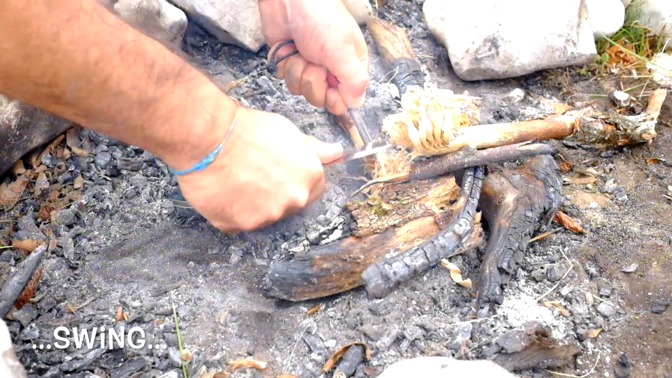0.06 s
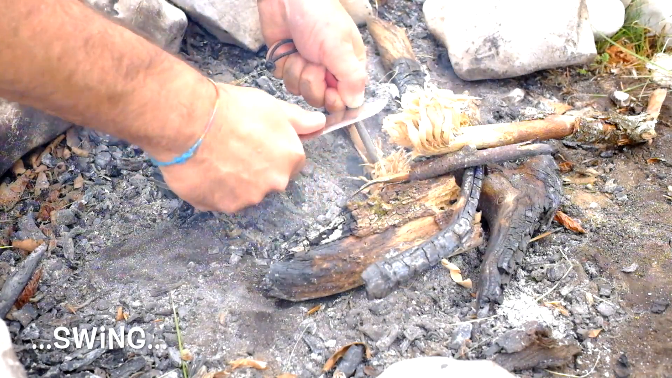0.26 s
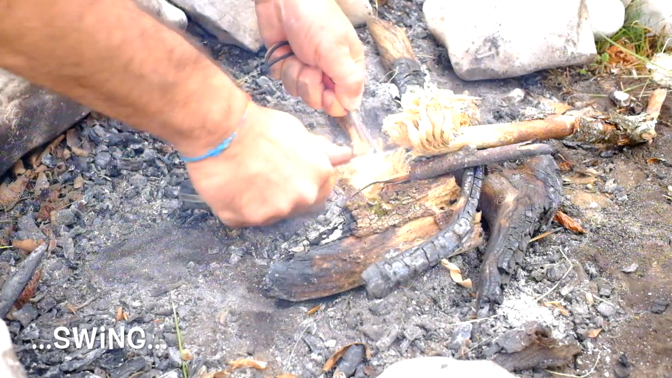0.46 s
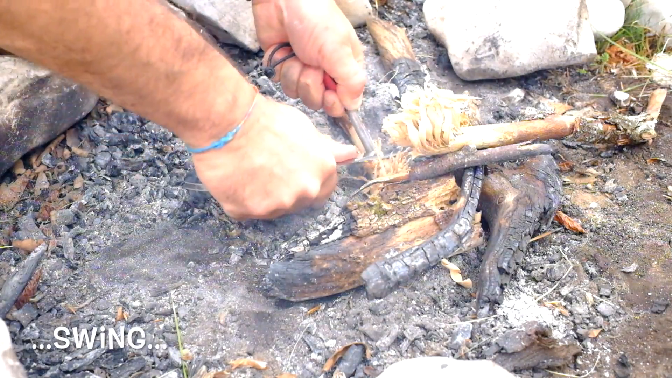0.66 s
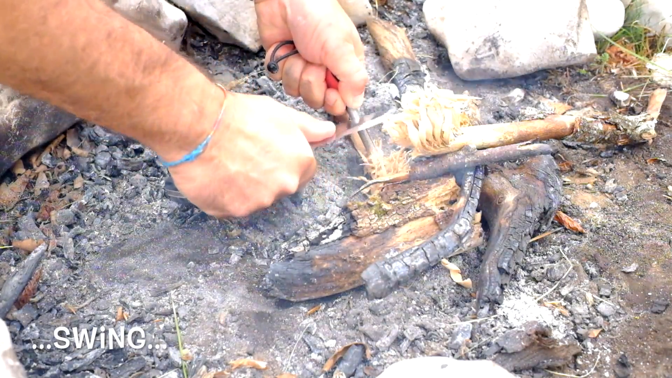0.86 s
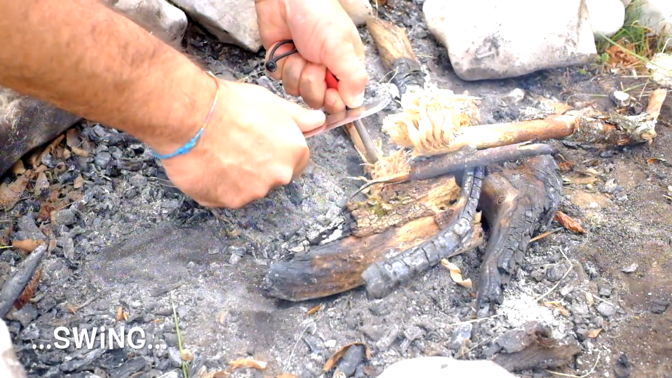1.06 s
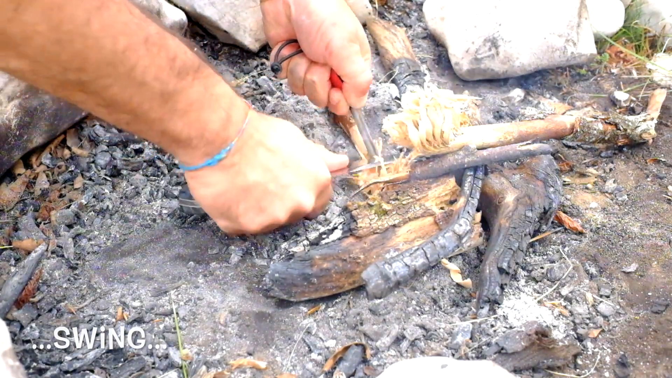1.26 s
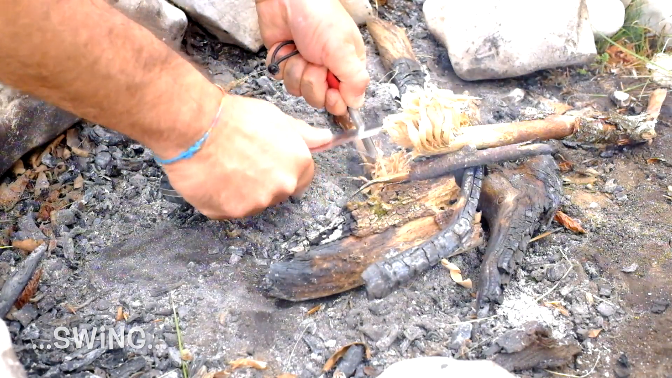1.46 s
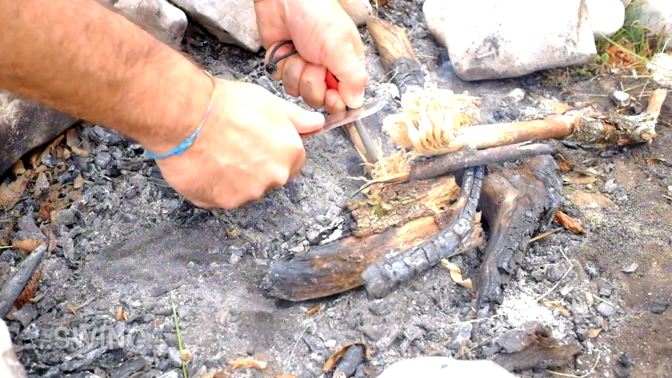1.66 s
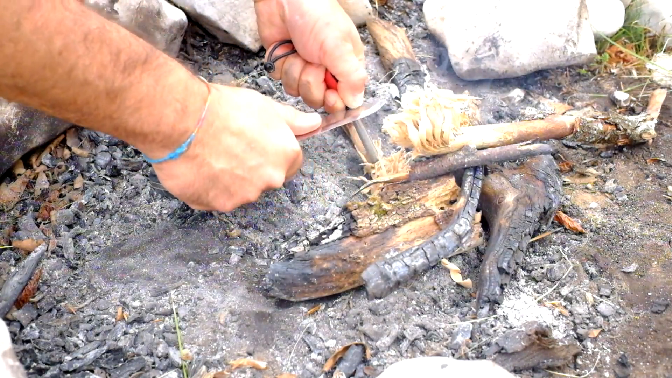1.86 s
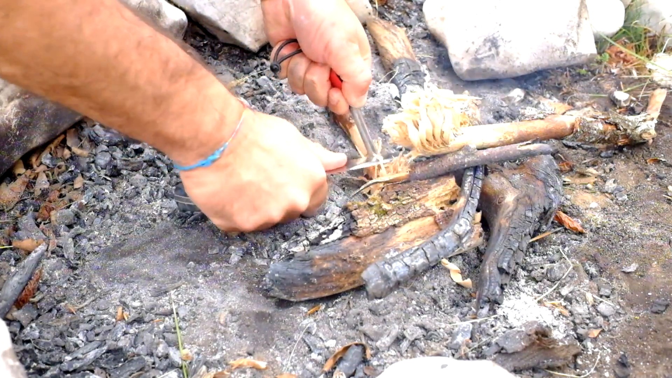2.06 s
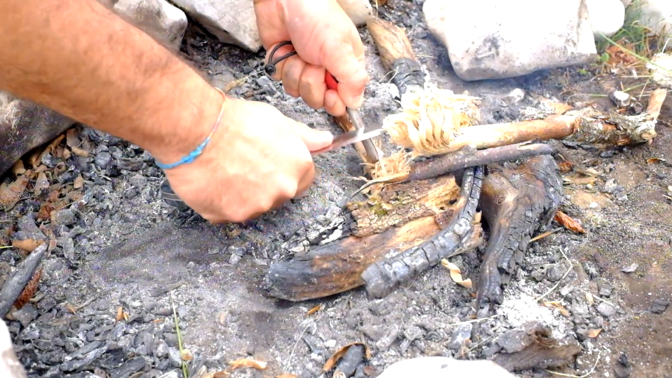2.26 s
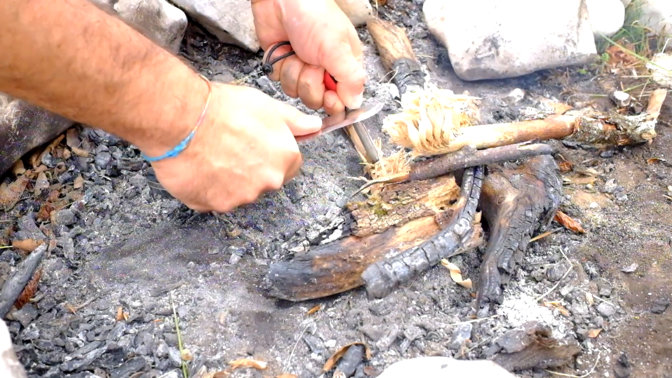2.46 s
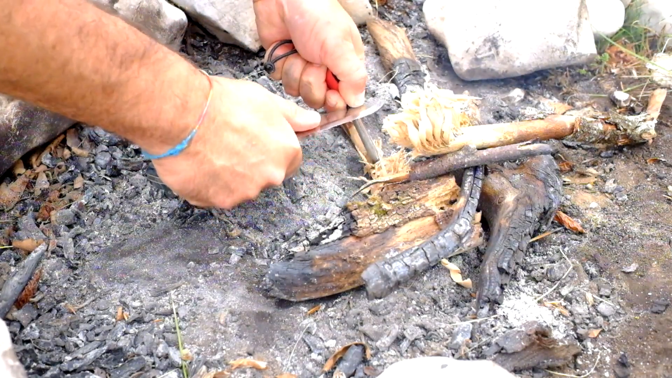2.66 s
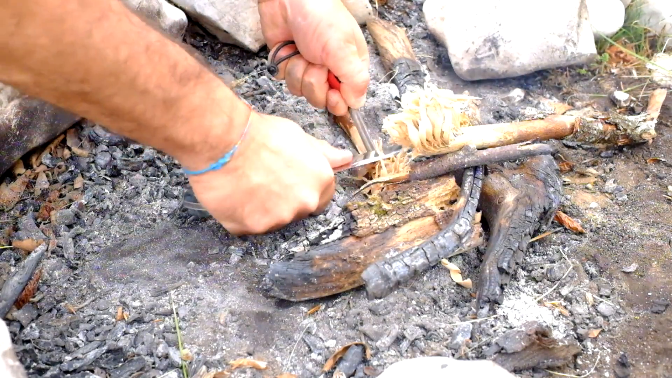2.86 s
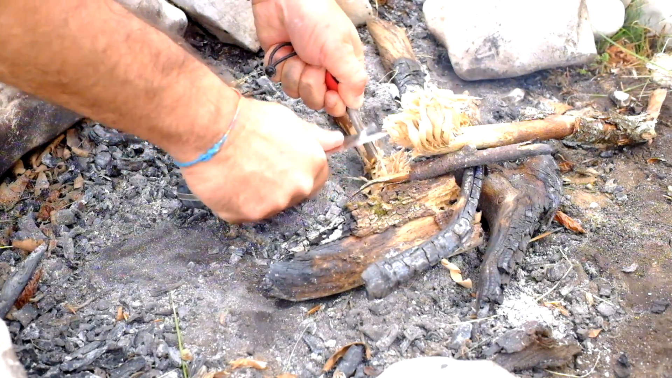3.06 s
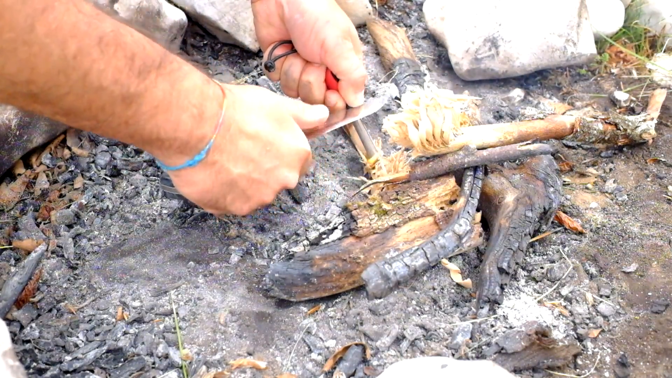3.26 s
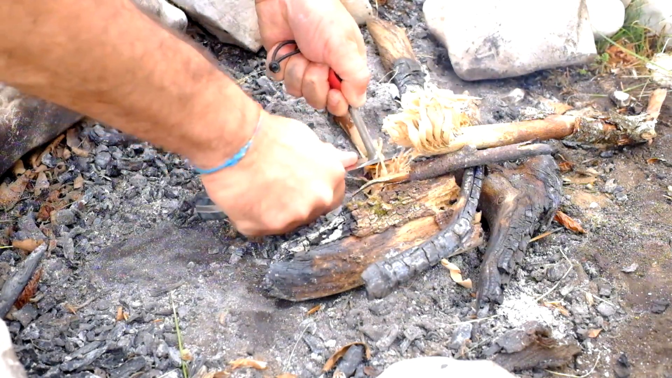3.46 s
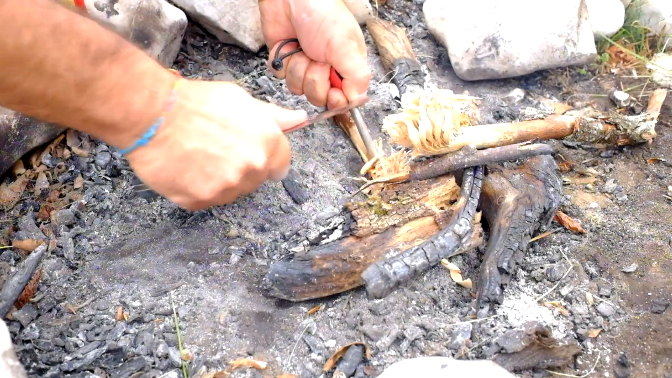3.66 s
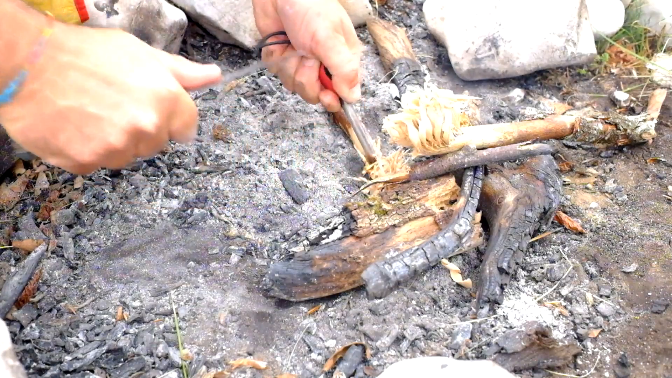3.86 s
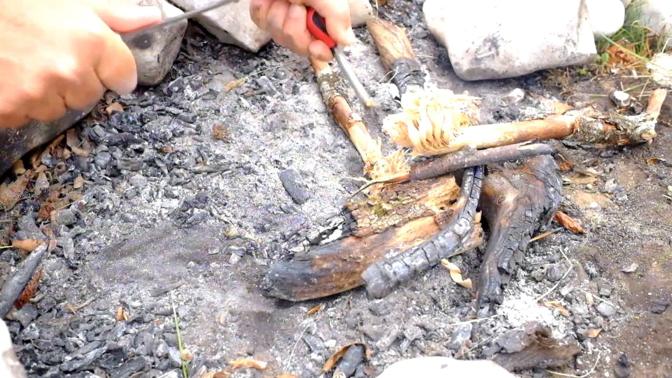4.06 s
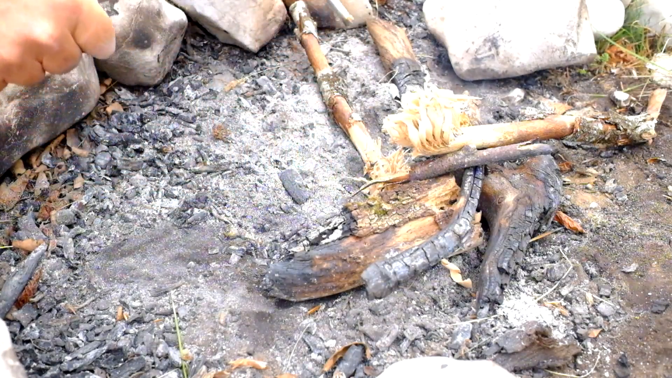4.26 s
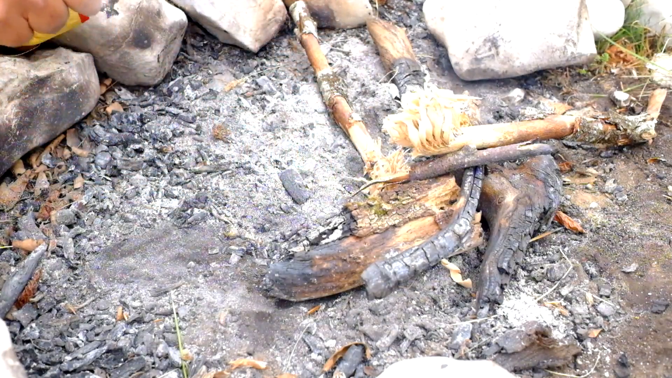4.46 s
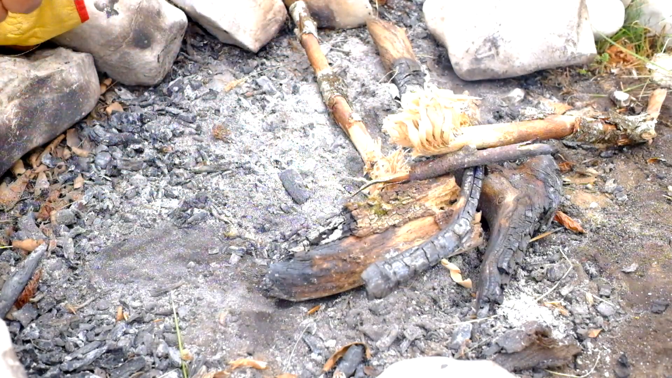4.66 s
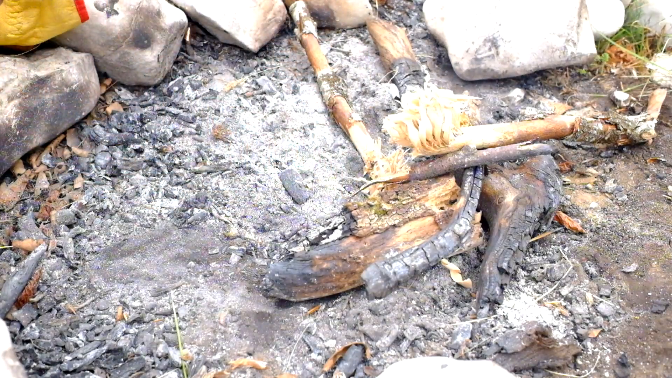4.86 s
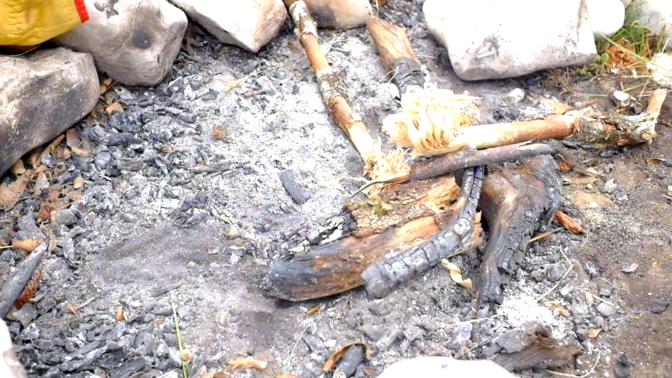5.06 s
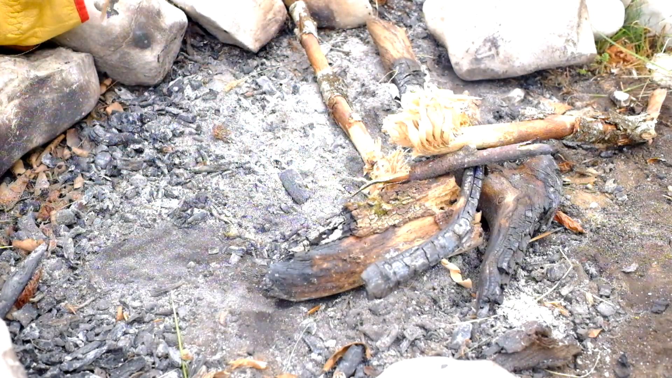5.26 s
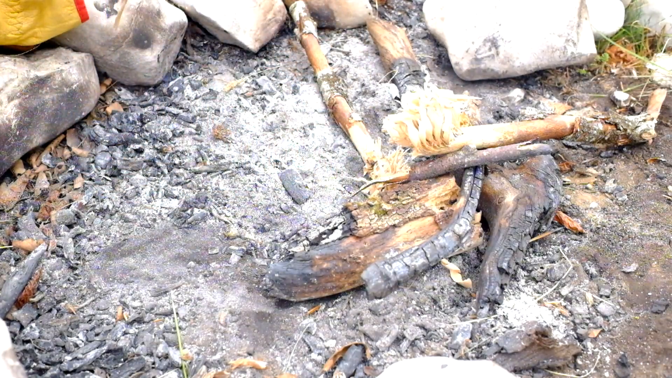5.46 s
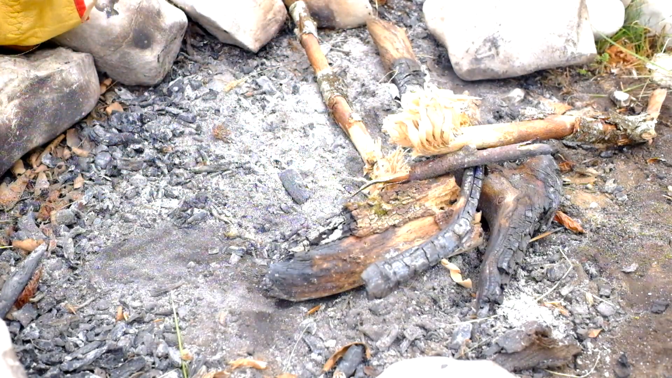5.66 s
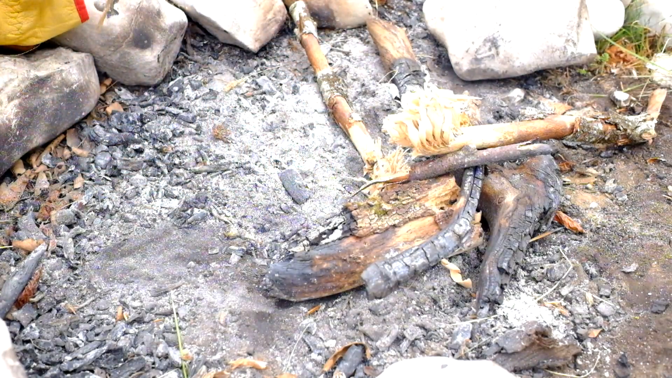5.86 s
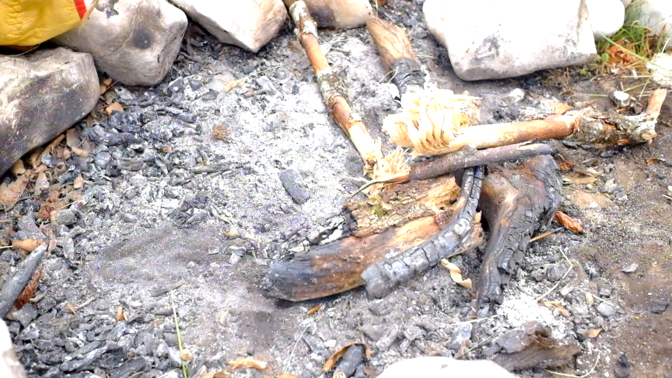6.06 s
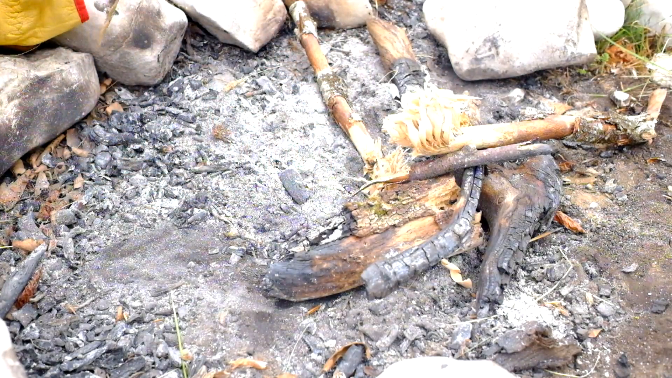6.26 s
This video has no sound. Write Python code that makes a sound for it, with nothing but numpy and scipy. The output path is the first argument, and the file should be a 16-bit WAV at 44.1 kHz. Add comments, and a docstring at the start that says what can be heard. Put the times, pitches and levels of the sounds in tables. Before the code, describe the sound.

Very close and nearly mono outdoors at a fire pit: a steel blade rasps down a fire-starting rod five times in about three and a half seconds, each short stroke chattering, fizzing and thudding into the wood. Between strokes the blade slides back lightly, purring and faintly singing. It lifts off with a tick, then fine shavings snap and rustle irregularly over soft rumble and hiss.

```python
"""Outdoors at a fire pit, close and almost mono: a knife spine scrapes a ferro rod five times over wood shavings.
The blade slides back up the rod before each stroke: light friction noise, a purr and a higher singing tone.
Each stroke rasps (fractured noise through rod resonances), chatters, fizzes with sparks and shudders the wood.
Catches on ridges snap, thuds are sagging sines, and the steel leaves with a thin tick.
Then tinder crackles in filtered noise bursts, all over quiet rumble and hiss."""
import sys
import numpy as np
from scipy import signal
from scipy.fft import rfft, irfft, next_fast_len
from scipy.io import wavfile
from scipy.ndimage import map_coordinates

SR = 44100
rng = np.random.default_rng(int(sys.argv[2]) if len(sys.argv) > 2 else 0)


def wrap_up_sound(samples):
    """Save the sound to the file named by the first command line argument, as 16-bit audio."""
    columns = np.atleast_2d(samples).T
    # keep every value between -1 and 1, then stretch to whole-number steps
    tamed = np.clip(columns, -1, 1)
    steps = np.round(tamed * 32767).astype(np.int16)
    wavfile.write(sys.argv[1], SR, steps)


N = 278130
TIME = np.arange(N) / SR
SIZE = next_fast_len(N + SR // 2, True)
HZ = np.fft.rfftfreq(SIZE, 1 / SR)

# downstrokes: fastest moment t/s, run-up/s, run-out/s, grind level/dB, fizz level/dB,
# braking shudder level/dB, top ridge rate f/Hz, chatter level/dB
DOWNSTROKES = [(.533, 0.071, 0.089, -33.5, -39.5, -31.5, 432.3, -37),
               (1.287, .056, 0.081, -29.5, -36.5, -36.5, 736, -39.5),
               (2.047, 0.058, 0.088, -32.5, -39, -34.5, 737, -42),
               (2.888, 0.058, 0.09, -32.5, -38.5, -33.5, 731, -42),
               (3.494, 0.078, 0.077, -32, -37.5, -28.5, 561, -36.5)]
# resonances of rod, knife and wood: f/Hz, width/Hz, level above slope/dB
ROD_RESONANCES = [(179.6, 110, 7.5), (288.5, 35, 8.5), (656, 210, 6), (1017, 310, 11.5), (1144, 185, 5.5),
                  (1328, 220, 10), (1887, 185, 8), (2600, 190, 5), (3665, 330, 8), (4058, 200, 14),
                  (5610, 260, 9.5), (7040, 1100, 3), (8570, 2000, 5.5), (10800, 690, 5), (12200, 1200, 7)]
# spectral slope of a snap, under the resonances: f/Hz, relative density level/dB
SNAP_SLOPE = [(30, -13), (100, -3.5), (200, 0.5), (520, -1.5), (800, -4.5), (910, -12), (1050, -6.5),
              (1800, -5.5), (2400, -3), (4500, -6), (7500, -5), (12000, -7.5), (16000, -12.5)]
# bands of a snap, sharp snap then knock: low f/Hz, high f/Hz
SNAP_KNOCK_BANDS = [(1700, 17000), (40, 1700)]

USUAL_DB = -54  # level that stands for the usual speed of the light contacts


def amp(db):
    """Decibels to gain."""
    return 10 ** (np.asarray(db) / 20)


def unit(x):
    """Scale to rms 1."""
    return x / np.sqrt(np.mean(x ** 2) + 1e-20)


def along(points):
    """(Hz, value) points joined on a log-frequency axis."""
    f, v = np.transpose(points)
    return np.interp(np.log(HZ + 1), np.log(f), v)


def body(slope, modes):
    """Gain of a sloping spectrum with resonant peaks."""
    peaks_db = sum(db / (1 + (2 * (HZ - hz) / width) ** 2) for hz, width, db in modes)
    return amp(along(slope) + peaks_db)


def band(lo, hi, order=6):
    """Gain of a band-pass."""
    return ((1 + (lo / (HZ + 1)) ** (2 * order)) * (1 + (HZ / hi) ** (2 * order))) ** -.5


def ring(force, gain):
    """Pass a force through a causal (minimum-phase) filter that keeps its energy."""
    cepstrum = irfft(np.log(np.maximum(unit(gain), 1e-5)), SIZE)
    # fold the cepstrum onto positive time
    cepstrum[1:SIZE // 2] *= 2
    cepstrum[SIZE // 2 + 1:] = 0
    response = np.exp(rfft(cepstrum))
    return irfft(rfft(force, SIZE) * response, SIZE)[:N]


def wobble(rate_hz):
    """A smooth random curve, rate_hz knots a second."""
    knots = rng.standard_normal(int(N * rate_hz / SR) + 4)
    return map_coordinates(knots, [TIME * rate_hz])


def envelope(curves, fade_s=0.0044):
    """Gain over time from (s, dB) curves, faded at the ends of each."""
    gain = np.zeros(N)
    for rows in curves:
        s, db = np.transpose(rows)
        inside_s = np.minimum(TIME - s[0], s[-1] - TIME)
        gain += amp(np.interp(TIME, s, db)) * np.clip(1 + inside_s / fade_s, 0, 1)
    return gain


def bell(t, width):
    """A peak of height 1 at t = 0 with long skirts."""
    return 1 / (1 + (t / width) ** 2)


def contact(start, end, attack, release):
    """Gain that swells as the blade touches and fades as it leaves."""
    return (1 + np.tanh((TIME - start) / attack)) * (1 + np.tanh((end - TIME) / release)) / 4


def grit(rate_hz, spread_db, smooth):
    """Tiny random fractures of unequal size on a bed of smooth friction, rms 1."""
    spread = np.clip(rng.standard_normal(N), -2, 2)
    sizes = amp(spread_db * spread) * rng.choice([-1, 1], N)
    fractures = unit(sizes * (rng.random(N) < rate_hz / SR))
    return unit(fractures + smooth * rng.standard_normal(N))


def rough_tone(pitch_hz, rate_hz):
    """A sine of the given pitch curve under a random wobble of rate_hz knots a second, rms 1."""
    return unit(wobble(rate_hz) * np.sin(2 * np.pi * np.cumsum(pitch_hz) / SR))


def add(track, s, sound):
    """Mix a sound into a track at time s."""
    part = track[max(round(s * SR), 0):][:len(sound)]
    part += sound[:len(part)]


def rubbing(gains, colour, force):
    """One friction force shakes the wood, grinds in the rod and fizzes at the edge."""
    # shudder, grind, fizz: low f/Hz, high f/Hz
    rub_bands = [(20, 400), (400, 1700), (1700, 17000)]
    return sum(gain * ring(force, colour * band(*edges)) for gain, edges in zip(gains, rub_bands))


def stroke_gains():
    """Shudder, grind and fizz: the hand pushes off, dashes down the rod and brakes."""
    speed_up_s, slow_down_s, grind_power = 0.0088, 0.016, 0.5  # grinding grows with speed
    fizz_rise_db_per_s, fizz_fall_db_per_s, fizz_lead_s = 167, 268, 0.0062  # peaks before top speed
    push_lead_s, brake_lag_s, jolt_s = 0.041, 0.028, 0.02  # shudder as the hand starts and stops
    push_db, brake_power = -37, 0.91
    bite_s, lift_off_s = 0.007, 0.011  # the edge digs in, and leaves the rod
    gains = np.zeros((3, N))
    for s, run_up_s, run_out_s, grind_db, fizz_db, shudder_db, _, _ in DOWNSTROKES:
        t = TIME - s
        speed = bell(t, np.where(t < 0, speed_up_s, slow_down_s))
        grind = amp(grind_db) * speed ** grind_power
        push = amp(push_db) * bell(t + push_lead_s, jolt_s)
        brake = amp(shudder_db) * bell(t - brake_lag_s, jolt_s) ** brake_power
        past_s = t + fizz_lead_s
        fizz = amp(fizz_db + np.minimum(fizz_rise_db_per_s * past_s, -fizz_fall_db_per_s * past_s))
        touching = contact(s - run_up_s, s + run_out_s, bite_s, lift_off_s)
        gains += touching * np.array([np.hypot(push, brake), grind, fizz])
    return gains


def strokes(shudder_noise_db=-3):
    """The hard stroke tears off chips in uneven bites; its shudder is part rumble, part chatter tone."""
    # spectral slope of the scrape: f/Hz, relative density level/dB
    scrape_slope = [(30, -20), (80, -24.5), (140, -0.5), (450, -10), (780, -9.5), (880, -21.5), (1000, -18),
                    (1600, -21), (2300, -14.5), (4800, -17), (8000, -18), (11000, -30), (16000, -52)]
    bites = amp(1.03 * wobble(260))
    force = unit(grit(rate_hz=2500, spread_db=1.5, smooth=0.57) * bites)
    shudder, grind, fizz = stroke_gains()
    gains = amp(shudder_noise_db) * shudder, grind, fizz
    return rubbing(gains, body(scrape_slope, ROD_RESONANCES), force)


def chatter(slow_hz=130, dash_s=0.016, span_s=0.047, spacing_rad=1.0, height_spread=0.5, shudder_tone_db=-3.5):
    """The edge skips over ridges: a rough tone follows the hand's speed and shakes the wood when slow."""
    out, t = np.zeros(N), np.arange(-SR // 8, SR // 8) / SR
    shudder = amp(shudder_tone_db) * stroke_gains()[0]
    for s, *_, top_hz, db in DOWNSTROKES:
        rate_hz = slow_hz + (top_hz - slow_hz) * bell(t, dash_s)
        ridges = np.cumsum(rate_hz) / SR
        # spacing and height drift, one knot per 1.3 ridges
        spacing, height = (map_coordinates(row, [ridges / 1.3]) for row in rng.standard_normal((2, 200)))
        wave = np.sin(2 * np.pi * ridges + spacing_rad * spacing)
        tone = unit(wave * (1 + height_spread * height))
        skipping = amp(db) * np.exp(-(t / span_s) ** 4)
        level = np.hypot(skipping, np.interp(s + t, TIME, shudder))
        add(out, s + t[0], level * tone)
    return out


def sparks(spark_re_grind_db=-22):
    """Burning chips sizzle in the treble, loudest while the edge grinds hardest."""
    colour = band(7400, 17000) * amp(along([(7000, -19), (12000, 11), (16000, -4)]))
    sizzle = ring(grit(rate_hz=1300, spread_db=2, smooth=0.76), colour)
    return amp(spark_re_grind_db) * stroke_gains()[1] * sizzle


def slide_gains(speed, climb, touch_s=0.0073):
    """Shudder, grind and fizz of light contacts: a return tilts as it climbs, a brush peaks and fades."""
    # passing brushes on the rod: t/s, length/s, shudder level/dB, grind level/dB, fizz level/dB
    brush_events = [(0.022, 0.037, -64, -65.5, -63.5), (0.08, .018, -52, -54, -59),
                    (0.629, .022, -71, -47, -54), (0.684, 0.048, -77, -58, -62),
                    (1.043, 0.053, -56, -52, -65), (1.131, 0.063, -56, -49, -56.5),
                    (3.603, 0.034, -44, -49, -55), (3.639, .028, -49, -46.5, -52.5),
                    (3.7, 0.101, -53, -48, -54.5), (3.816, 0.049, -64, -47.5, -59),
                    (4.037, 0.061, -53, -42, -50)]
    brush_fade_db_per_s = 72
    shudder_follows, grind_follows = 0.16, 0.8  # wood and rod follow a share of each swing in speed
    # shudder, grind, fizz: dB re speed level at the foot and at the top of the rod
    foot_top_db = (5, 1.5), (3.5, 1.5), (-8, -2)
    tilts = [amp(USUAL_DB + foot + (top - foot) * climb) for foot, top in foot_top_db]
    gains = np.array([speed ** shudder_follows, speed ** grind_follows, speed]) * tilts
    for s, length_s, *levels_db in brush_events:
        fade = amp(-brush_fade_db_per_s * np.abs(TIME - s))
        gains += np.outer(amp(levels_db), fade * contact(s, s + length_s, touch_s, touch_s))
    return gains


def slides(low_hz=2000, high_hz=2500, sing_follows=.16, sing_db=-6, damped=0.92):
    """The light return drags over ridges that purr; it sings higher with speed and nearing the hand."""
    # slides up the rod, one curve each: t/s, speed as level/dB
    return_curves = [
        [(0.108, -48.0), (0.134, -51.5), (0.154, -43.5), (0.237, -58.5), (0.317, -52.5)],
        [(0.749, -44.5), (0.845, -58.0), (0.857, -52.0), (0.885, -50), (0.913, -53.5), (0.925, -48),
         (1.017, -50.5), (1.029, -63.5)],
        [(1.427, -69.5), (1.447, -56.5), (1.562, -48.5), (1.642, -73), (1.666, -58.5), (1.714, -59.5)],
        [(2.139, -53.5), (2.195, -47), (2.295, -59.0), (2.371, -53), (2.419, -68.5), (2.47, -57.5),
         (2.53, -76.5), (2.566, -58.5), (2.586, -76)],
        [(3.069, -66.5), (3.097, -62), (3.157, -48.0), (3.221, -55.5), (3.261, -52.5), (3.297, -64),
         (3.308, -68)],
    ]
    # spectral slope of the slide: f/Hz, relative density level/dB
    slide_slope = [(30, -4), (85, 0.5), (135, 11.5), (450, -5), (780, -12), (900, -22.5), (1020, -18),
                   (1600, -20.5), (2200, -20.5), (3200, -21), (5000, -27), (8500, -32.5), (16000, -42)]
    purr_hz, purr_follows, purr_db = 212.5, .6, -5.5  # ridge rate at usual speed; level re shudder
    upper_ratio, upper_db = 1.8, -5  # second, higher partial of the contact
    force = unit(grit(rate_hz=1200, spread_db=3.0, smooth=0.77) * amp(1.95 * wobble(110)))
    turns_s = [s for rows in return_curves for s in (rows[0][0], rows[-1][0])]
    climb = np.interp(TIME, turns_s, [0, 1] * len(return_curves))  # 0 foot, 1 top
    speed = envelope(return_curves) / amp(USUAL_DB)
    pace = np.maximum(speed, .5)
    pitch_hz = (low_hz + (high_hz - low_hz) * climb) * pace ** sing_follows
    sing = rough_tone(pitch_hz, rate_hz=400)
    sing = sing + amp(upper_db) * rough_tone(upper_ratio * pitch_hz, rate_hz=500)
    purr = rough_tone(purr_hz * pace ** purr_follows, rate_hz=70)
    # the flat of the blade damps the resonances
    modes = [(hz, width, damped * db) for hz, width, db in ROD_RESONANCES]
    gains = slide_gains(speed, climb)
    shudder, _, fizz = gains
    friction = rubbing(gains, body(slide_slope, modes), force)
    return friction + amp(sing_db) * fizz * sing + amp(purr_db) * shudder * purr


def snaps(events, bands, colour, spike, tail_db, tail_t60_s, size_spread):
    """A sharp first break, milliseconds of tearing and a faint scatter from the stones."""
    out, t = np.zeros(N), np.arange(SR // 20) / SR
    answers = [ring([1.], colour * band(*edges))[:len(t)] for edges in bands]
    for s, *levels_db, length_s in events:
        tearing = (1 + t / length_s) * np.exp(-(t / length_s) ** 4)
        scatter = amp(tail_db - 60 * t / tail_t60_s)
        noise = rng.standard_normal(len(t)) * amp(2.5 * rng.standard_normal(len(t)))
        force = (tearing + scatter) * noise
        force[0] -= spike * np.linalg.norm(force)
        # every piece has its own size, so it rings a little higher or lower
        stretch = 1 + size_spread * rng.uniform(-1, 1)
        for answer, db in zip(answers, levels_db):
            sound = signal.fftconvolve(force, map_coordinates(answer, [t * SR * stretch]))
            # level: energy spread over 5 ms
            add(out, s, amp(db) * sound * np.sqrt(.005 * SR / np.sum(sound ** 2)))
    return out


def catches():
    """The edge catches on ridges and knocks the rod."""
    # t/s, snap level/dB, knock level/dB, length/s
    catch_events = [(.103, -56, -30.5, 0.0017), (.558, -40.5, -33, 0.0054), (.567, -45, -28.5, 0.0044),
                    (.63, -52, -38, .004), (.75, -56, -43, 0.024), (.928, -46, -36.5, 0.0042),
                    (1.05, -47.5, -37.5, 0.0081), (1.063, -39.5, -35.5, 0.0045),
                    (1.134, -48.5, -39.5, 0.0097), (1.3015, -43, -28.5, 0.0026), (1.398, -60, -48, .002),
                    (1.768, -63, -52.5, 0.0021), (2.041, -43, -28, .004), (2.883, -43, -27, 0.0069),
                    (2.909, -45, -33, .003), (2.9715, -53, -47, .002), (2.988, -56, -48, .002),
                    (3.257, -62, -42, 0.0025), (3.583, -37, -32, .0016), (3.82, -56, -42.5, 0.0048),
                    (3.957, -54, -47.5, 0.0054), (4.038, -46, -36.5, 0.0054)]
    colour = body(SNAP_SLOPE, ROD_RESONANCES) * amp(along([(1500, 4.0), (14000, -5.0)]))
    return snaps(catch_events, SNAP_KNOCK_BANDS, colour,
                 spike=.55, tail_db=-11, tail_t60_s=.035, size_spread=.02)


def blade(lift_s=3.957):
    """The steel gives one thin tick as it leaves the rod: decaying sines."""
    # blade resonances: f/Hz, peak level/dB, t60/s
    blade_resonances = [(5230, -48, .016), (5650, -37.5, 0.012), (7700, -51, .012)]
    out, t = np.zeros(N), np.arange(SR // 10) / SR
    tick = sum(amp(db - 60 * t / t60_s) * np.sin(2 * np.pi * hz * t) for hz, db, t60_s in blade_resonances)
    add(out, lift_s, tick)
    return out


def thuds(rise=0.46, sag_s=0.019):
    """A padded push on the wood as the hand turns or a stick settles; pitch sags as pressure lets go."""
    # t/s, peak level/dB, reference f/Hz (pitch falls from 1.48 towards 0.48 of it), life/s
    thud_events = [(0.318, -34, 156.2, 0.021), (.561, -23, 172, 0.016), (1.067, -40, 147, 0.025),
                   (1.714, -40.5, 151, 0.02), (2.584, -47, 155, 0.016), (3.122, -38, 151, 0.014),
                   (3.525, -34, 153.6, 0.026), (3.709, -32, 146, 0.019), (4.3649, -31, 150, 0.004),
                   (4.85, -27.5, 184, 0.004)]
    out, t = np.zeros(N), np.arange(SR // 10) / SR
    for s, db, reference_hz, life_s in thud_events:
        pitch_hz = reference_hz * (0.48 + np.exp(-t / sag_s))
        swell = (1 - np.exp(-(t / (rise * life_s)) ** 2)) * np.exp(-(t / life_s) ** 2)
        add(out, s, amp(db) * swell / swell.max() * np.sin(2 * np.pi * np.cumsum(pitch_hz) / SR))
    return out


def tinder():
    """Fibres snap over rubbing sticks and the fine, clumped rustle of a curling shaving."""
    # fibre snaps: t/s, snap level/dB, stick knock level/dB, length/s
    crackle_events = [(4.143, -55.5, -53.5, .003), (4.18, -52, -49.5, .002), (4.1945, -40, -45, 0.0073),
                      (4.2028, -54, -42, 0.003), (4.2067, -29, -30, 0.003), (4.227, -46, -52, 0.0048),
                      (4.287, -39, -47, 0.0083), (4.3003, -26.5, -35, 0.0026), (4.343, -48, -48, 0.0039),
                      (4.3628, -40.5, -36, 0.0048), (4.4278, -35.5, -50, 0.0033),
                      (4.4485, -39.5, -48.5, 0.0039), (4.6037, -29.5, -37.5, 0.0033),
                      (4.6065, -31, -42.5, 0.0032), (4.716, -56, -63, .004), (4.809, -44.5, -46, 0.0061),
                      (4.849, -35.5, -38.5, 0.0029), (4.8905, -40.5, -51, .003),
                      (4.958, -46.5, -56, 0.0055), (5.1408, -35.5, -42.5, 0.0021),
                      (5.6405, -49, -42.5, 0.0021), (5.6545, -42, -47, 0.004), (5.661, -39, -29, 0.0045),
                      (5.6747, -34, -30, 0.0031), (5.6875, -48, -53, .0076), (5.721, -31, -33.5, .0046),
                      (5.9625, -53, -55, 0.0038)]
    # resonances of tinder and sticks: f/Hz, width/Hz, level above slope/dB
    tinder_resonances = [(700, 220, 7), (1130, 240, 11), (1380, 180, 5), (2700, 340, 3), (3100, 300, 6),
                         (3680, 320, 9), (4220, 320, 6), (5000, 340, 7), (8000, 700, 4)]
    # sticks rub as they settle: t/s, level/dB
    shifting_curve = [(4.25, -60.5), (4.295, -49.5), (4.325, -65), (4.38, -48.5), (4.42, -58)]
    # a shaving curls and crinkles: t/s, level/dB
    curling_curve = [(4.81, -40.5), (4.84, -43.5), (4.88, -46.5), (4.95, -56.5)]
    # rustle spectrum: f/Hz, relative density level/dB
    rustle_slope = [(40, -16), (200, 0), (350, -10), (540, 4.5), (1000, -20), (1600, -2.5), (2300, 1),
                    (3100, -3), (3900, -18), (5500, -9.5), (11000, -12), (16000, -21)]
    wood = body(SNAP_SLOPE, tinder_resonances)
    force = unit(grit(rate_hz=1400, spread_db=5, smooth=.55) * amp(2.8 * wobble(220)))
    rub = envelope([shifting_curve]) * ring(force, wood * amp(along([(1500, -2), (12000, -8.5)])))
    crinkle = unit(grit(rate_hz=600, spread_db=5, smooth=.35) * amp(3 * wobble(180)))
    rustle = envelope([curling_curve]) * ring(crinkle, amp(along(rustle_slope)))
    crackle_colour = wood * amp(along([(250, -7), (600, -2), (1100, 1), (1800, 0)]))
    crackle = snaps(crackle_events, SNAP_KNOCK_BANDS, crackle_colour,
                    spike=.5, tail_db=-12, tail_t60_s=.022, size_spread=.035)
    return rub + rustle + crackle


def air(air_db=-60.5, sway_db=0.6):
    """Quiet outdoor rumble that sways under a steady hiss, wider in the treble."""
    # air spectrum: f/Hz, relative density level/dB
    air_slope = [(12, -76), (20, -8), (43, -7.5), (60, -5.5), (113, -4), (177, -8), (285, -12.6),
                 (357, -13.6), (976, -18), (2390, -23.5), (2600, -24.5), (14700, -28.5), (16000, -30.5)]
    # stereo width: f/Hz, side re mid level/dB
    side_slope = [(30, -31), (300, -27.5), (1800, -17.5), (5000, -12.5), (13000, -6.5)]
    colour = amp(along(air_slope))
    mid = ring(rng.standard_normal(N), colour)
    rumble = irfft(rfft(mid, SIZE) * band(10, 1500), SIZE)[:N]
    mid = mid + rumble * (amp(sway_db * wobble(4.9)) - 1)
    wide = ring(rng.standard_normal(N), colour)
    side = irfft(rfft(wide, SIZE) * amp(along(side_slope)), SIZE)[:N]
    return amp(air_db) * np.array([mid + side, mid - side])


def scene():
    """All the work sits in the centre; only the air is stereo."""
    work = strokes() + chatter() + sparks() + slides() + catches() + blade() + thuds() + tinder()
    return work + air()


def record(dry, top_hz=16200):
    """Brick-wall low-pass: nothing from top_hz up is kept."""
    return irfft(rfft(dry, SIZE) * (HZ < top_hz), SIZE)[:, :N]


dry = scene()
out = record(dry)
wrap_up_sound(out)
```